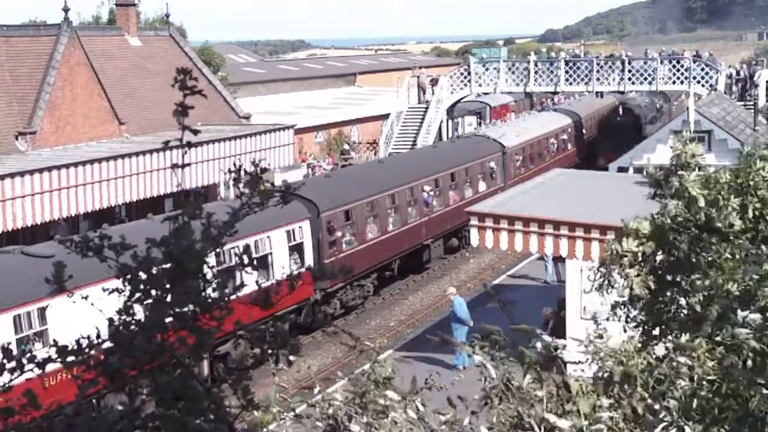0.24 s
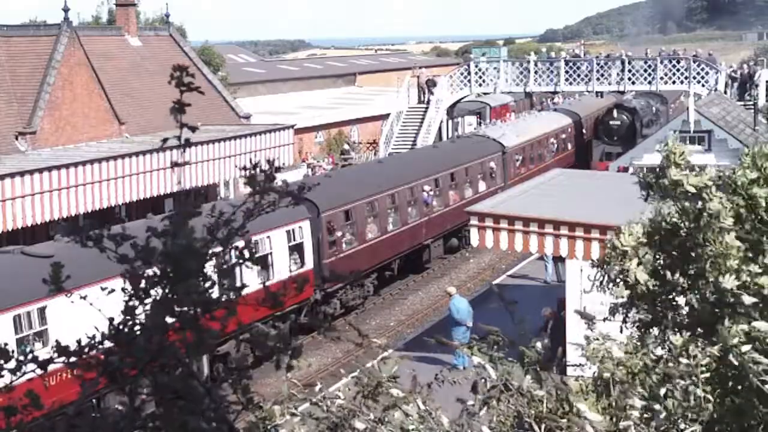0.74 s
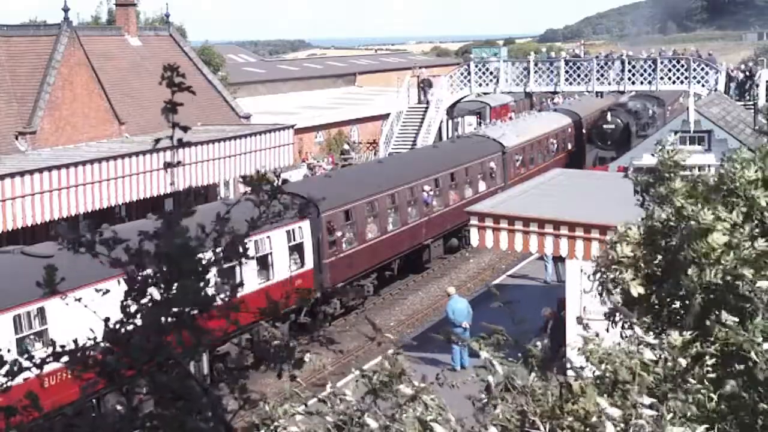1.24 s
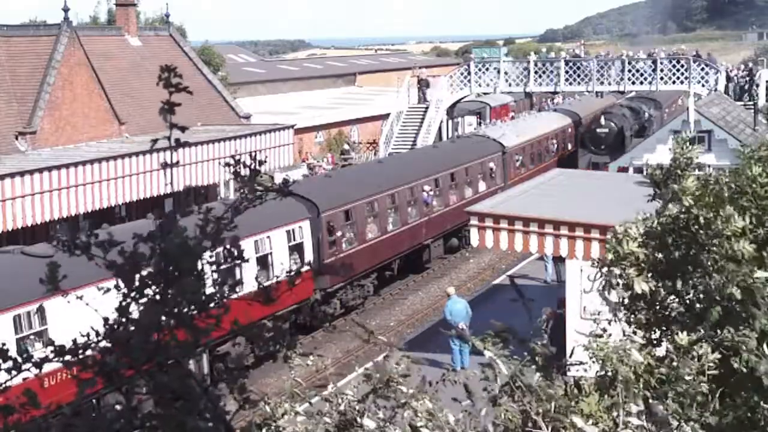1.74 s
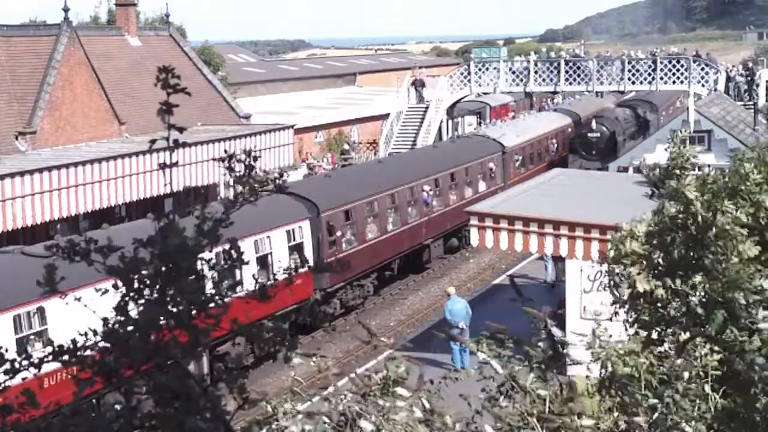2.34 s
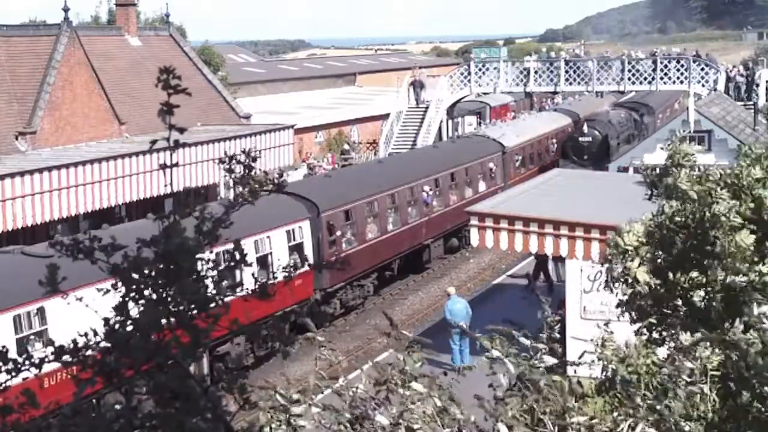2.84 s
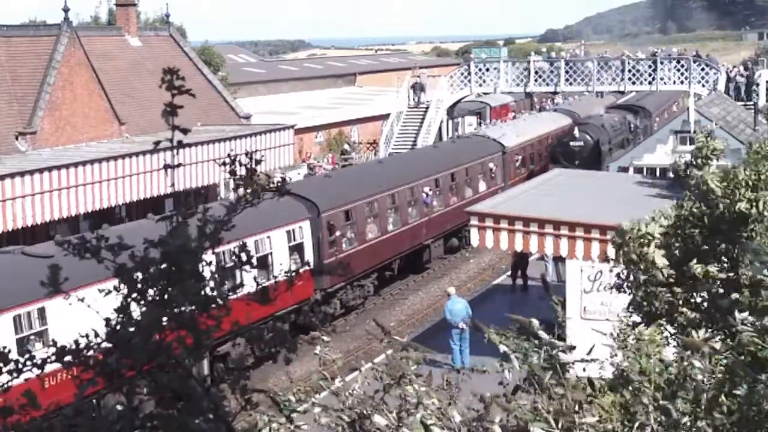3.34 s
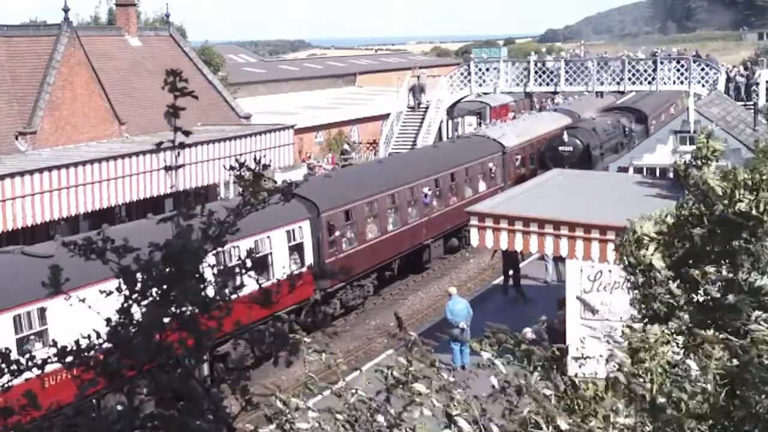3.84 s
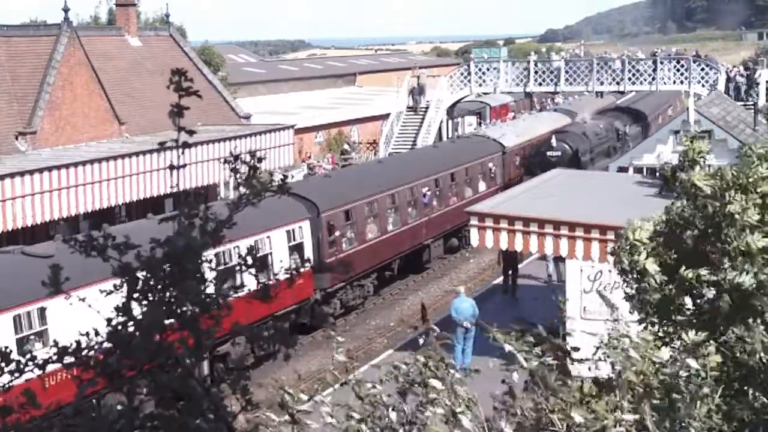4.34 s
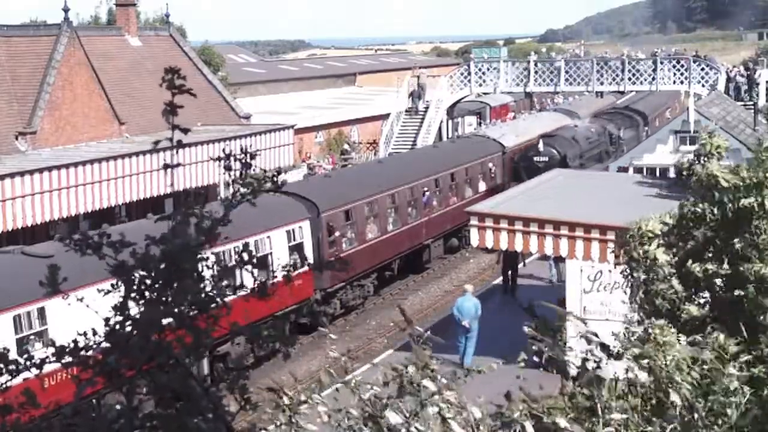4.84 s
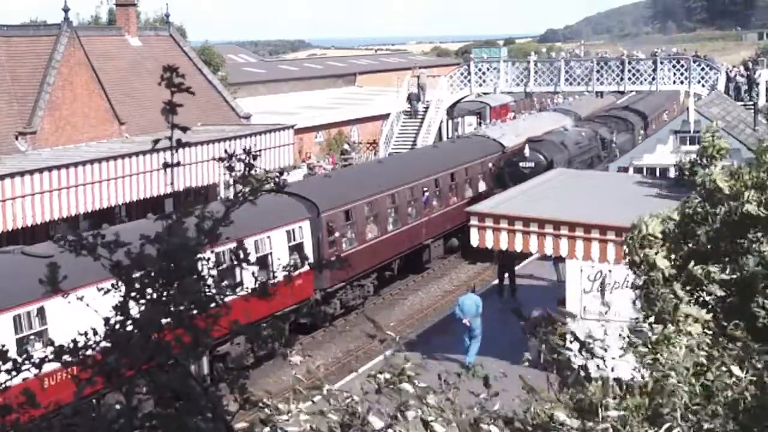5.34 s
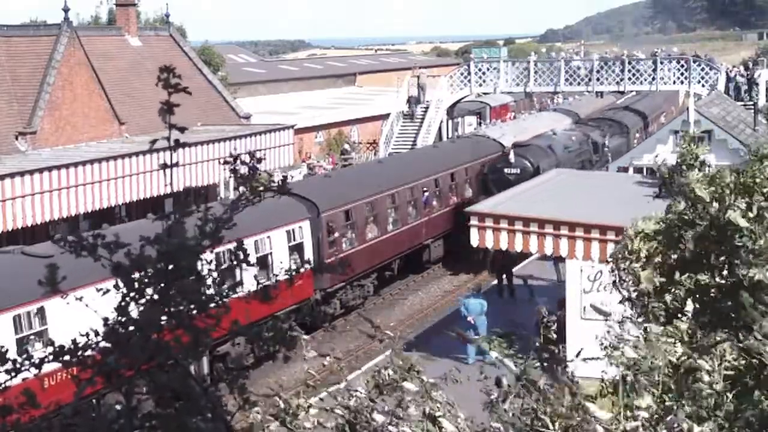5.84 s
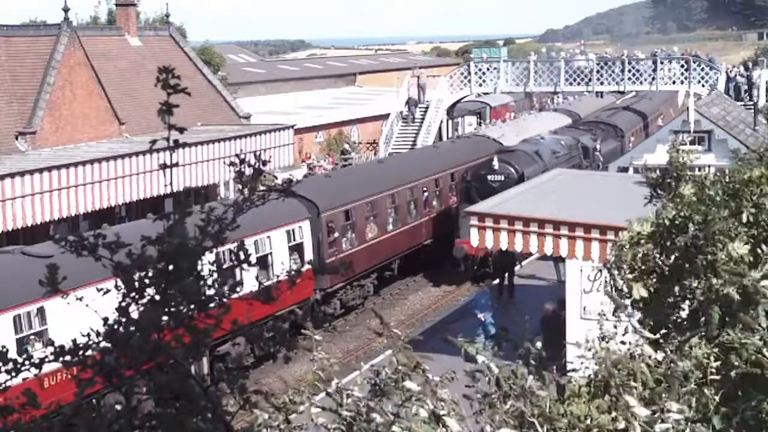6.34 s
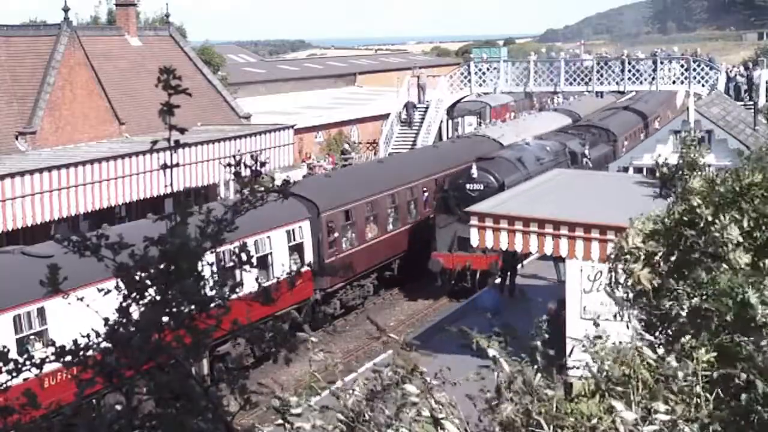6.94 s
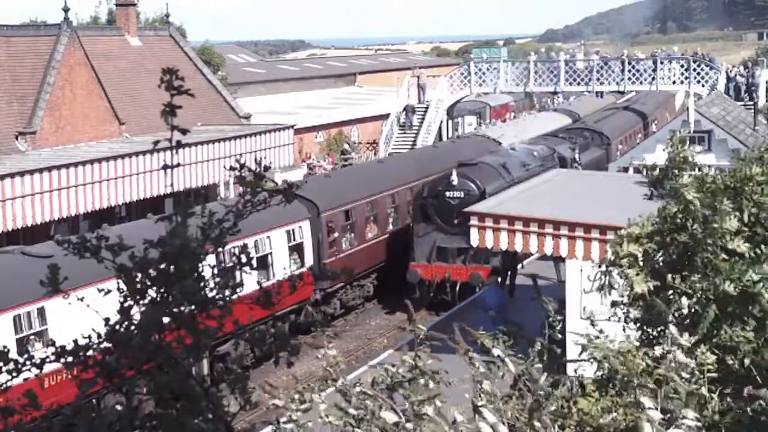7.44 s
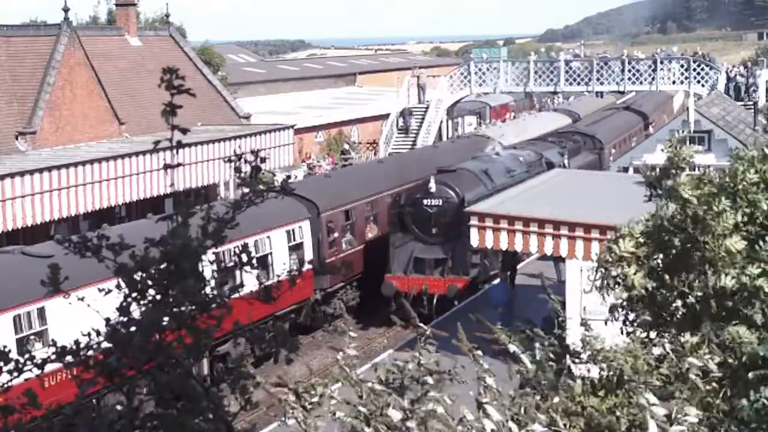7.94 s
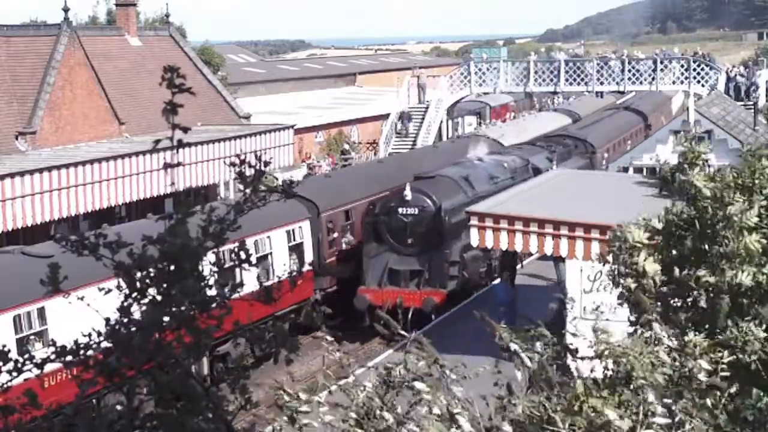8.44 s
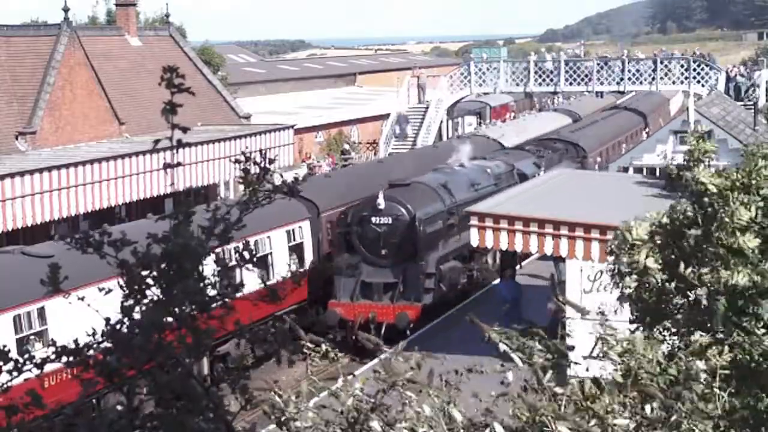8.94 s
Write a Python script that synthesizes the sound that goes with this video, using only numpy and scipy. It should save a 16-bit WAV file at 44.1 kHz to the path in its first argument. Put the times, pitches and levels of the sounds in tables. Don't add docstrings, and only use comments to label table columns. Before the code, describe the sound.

Fluttering steam hiss gradually strengthens above a low rolling rumble and falling hum, while a heavy wind gust thumps the microphone around three seconds.

```python
import sys
import numpy as np
from scipy import signal
from scipy.fft import rfft, irfft
from scipy.io import wavfile
from scipy.ndimage import uniform_filter1d, map_coordinates

SR = 44100
rng = np.random.default_rng(int(sys.argv[2]) if len(sys.argv) > 2 else 0)


def gain_from_decibels(decibels):
    exponent = np.asarray(decibels, float) / 20
    return 10 ** exponent


def to_wav(s):
    ch = np.atleast_2d(s).T
    pcm = np.round(np.clip(ch, -1, 1) * 32767)
    wavfile.write(sys.argv[1], SR, pcm.astype(np.int16))


N = 405279


def evened(x):
    return x / np.sqrt(np.mean(x ** 2) + 1e-20)


def read_spectrum(points, hz):
    f, value = np.transpose(points)
    return np.interp(np.log(hz + 1), np.log(f + 1), value)


def read_curves(rows, t):
    s, *values = np.transpose(rows)
    return [np.interp(t, s, v) for v in values]


def stft_axes(size):
    hop = size // 4
    frames = N // hop + 5
    return np.arange(frames) * hop / SR, np.fft.rfftfreq(size, 1 / SR)[:, None]


def wander(t, lo_hz, hi_hz, count=30):
    hz = np.geomspace(lo_hz, hi_hz, count)[:, None]
    sines = np.sin(2 * np.pi * (hz * t + rng.random((count, 1))))
    return evened((sines / np.sqrt(hz)).sum(0))


def resonance(x, centre, width):
    return 1 / (1 + (2 * (x - centre) / width) ** 2)


def levelled(shape_db, band):
    power = (gain_from_decibels(shape_db) ** 2 * band).sum(-2, keepdims=True)
    return shape_db - 10 * np.log10(power)


# (frequency [Hz], lead [rad])
PORT_LEAD = [(0, -0.72), (1380, 0.38), (1980, 0.78), (2670, -0.25), (5510, 0.38), (7240, -0.4),
             (8350, -1.26), (10100, 0.29), (11000, -0.019), (14800, 0.0)]


def noise_pair(db, hz, same, patchy_db):
    bins, frames = db.shape[1:]
    a, b, c, d, patches = rng.standard_normal((frames, bins, 5)).T
    patches = uniform_filter1d(patches, size=9, axis=0)
    patches = evened(uniform_filter1d(patches, size=12, axis=1))
    same = np.clip(same, 0, 1)
    left = a + 1j * b
    right = same * left + np.sqrt(1 - same ** 2) * (c + 1j * d)
    right = right * np.exp(-1j * read_spectrum(PORT_LEAD, hz))
    z = np.array([left, right]) * gain_from_decibels(db + patchy_db * patches)
    size = 2 * (bins - 1)
    return signal.istft(z, nperseg=size, noverlap=size * 3 // 4)[1][:, :N]


# (peak [s], jet rise [dB], lower hiss rise [dB], half length [s])
STEAM_SURGES = [(0.52, 7, 4, 0.14), (0.905, 1.5, -0.5, 0.17), (1.079, 6.5, 5, 0.18), (1.197, -1, 6, 0.14),
                (1.384, 6, 10.5, 0.11), (1.503, 8, 9.5, 0.082), (2.882, 6, 2.5, 0.089),
                (3.122, 2.5, 1.5, 0.095), (3.259, 0, 6, 0.085), (3.693, 6.5, 1.2, 0.059),
                (3.957, 3.5, 0.8, 0.083), (4.208, 1.5, 4.5, 0.051), (4.313, 1, 1.5, 0.049),
                (4.515, 3, 1.5, 0.117), (4.593, 3, -0.5, 0.042), (5.07, 7.5, 0, 0.075),
                (5.247, 1.8, -1, 0.098), (5.424, 7.5, 4, 0.088), (5.582, 3.3, 1.9, 0.12),
                (5.846, 2.5, 3, 0.076), (6.403, 4.5, 0.3, 0.044), (7.296, 2.5, 3, 0.22),
                (7.732, 4.5, 2, 0.15), (7.752, 5.5, 1, 0.03), (7.883, 3.5, -0.3, 0.056),
                (8.089, 7, 1.5, 0.19), (8.333, 3, 2, 0.071), (8.62, 4.5, -0.5, 0.125), (8.744, 6, 3, 0.07),
                (8.911, 6.5, 0.2, 0.137)]


def surges(t):
    s, jet_db, lower_db, half_s = np.transpose(STEAM_SURGES)[:, :, None]
    swell = np.maximum(1 - abs(t - s) / half_s, 0)
    return (jet_db * swell).sum(0), (lower_db * swell).sum(0)


# (frequency [Hz], density [dB/Hz])
JET_SPECTRUM = [(880, -19), (1500, -22.5), (1640, -14), (1820, -21.5), (2020, -8), (2290, -9.5), (3980, -6),
                (4560, -7.5), (6150, -6.5), (7830, -3), (8540, -4.5), (11700, -20), (15100, -32)]
# (frequency [Hz], width [Hz], left [dB], right [dB])
PORT_CAVITIES = [
    (2080, 130, 0, 4.5),
    (2290, 450, -6, -5.5),
    (4110, 165, 4.5, 3.5),
    (7870, 150, 2.5, -1),
    (7790, 1160, 8.5, -3.5),
]
# (frequency [Hz], difference [dB])
PORT_LEAN = [(60, 3.5), (99, -5.5), (160, 1.5), (270, -0.5), (440, -1.0), (730, -0.5), (1200, 0), (1980, 4),
             (3270, 0.5), (5390, 4.5), (8890, -3), (14600, 0.5)]
# (frequency [Hz], correlation [0-1])
PORT_LIKENESS = [(60, 0.95), (99, 0.95), (160, 1), (270, 0.98), (440, 0.98), (730, 0.94), (1200, 0.8),
                 (1980, 0.95), (3270, 1), (5390, 0.58), (8890, 0.71), (14600, 0.26)]
# (time [s], jet level [dB], lower hiss level [dB])
HISS_LEVEL = [(0.0, -40, -36), (0.16, -41.5, -35.5), (0.28, -34.5, -38), (0.77, -37.5, -40.5),
              (1.22, -36, -41.5), (1.6, -31, -38), (1.97, -35.5, -36.5), (2.66, -35.5, -40.5),
              (3.03, -35, -41.5), (3.31, -28.8, -35.5), (3.66, -31.5, -37.5), (3.75, -27.1, -35),
              (4.19, -29, -35), (5.16, -31, -33.5), (6.01, -26.5, -34.0), (7.46, -30.0, -36.2),
              (8.43, -30, -35), (9.19, -24.5, -30)]
SWAY_DB = 1.3


def steam():
    t, hz = stft_axes(size=1024)
    jet_db, lower_db = np.add(read_curves(HISS_LEVEL, t), surges(t))
    pan_db = SWAY_DB * wander(t, 1.9, 12)
    jet_share = 1 / (1 + (5300 / (hz + 1)) ** 6)
    shape_db = levelled(read_spectrum(JET_SPECTRUM, hz), (hz > 5500) & (hz < 11000))
    flicker_db = 0.62 * wander(t, 6, 40)
    level_db = jet_share * jet_db + (1 - jet_share) * (lower_db + 5.0) + flicker_db
    surge_db = jet_db - uniform_filter1d(jet_db, size=75)
    octaves_up = np.log2(np.maximum(hz / 9500, 1))
    treble_db = (2.4 * (t - 7) - 0.48 * surge_db) * octaves_up
    lean_db = read_spectrum(PORT_LEAN, hz) + jet_share * (pan_db - pan_db.mean())
    db = shape_db + level_db + treble_db + np.array([lean_db, -lean_db]) / 2
    for f, width_hz, *ports_db in PORT_CAVITIES:
        db = db + np.reshape(ports_db, (2, 1, 1)) * resonance(hz, f, width_hz)
    return gain_from_decibels(1.0) * noise_pair(db, hz, read_spectrum(PORT_LIKENESS, hz), patchy_db=1.5)


# (time [s], level [dB])
ROLLING_LEVEL = [(0.0, -47.5), (0.94, -46.5), (1.53, -44.5), (1.87, -45.5), (2.43, -43.5), (2.56, -45),
                 (2.76, -41), (3.15, -43), (3.61, -42.5), (6.4, -44), (6.63, -43.5), (7.68, -42.5),
                 (8.37, -42.5), (9.19, -39.5)]
# (frequency [Hz], density [dB/Hz])
ROLLING_SPECTRUM = [(12, -35), (25, 0), (50, -4), (100, -14), (200, -12), (330, -18.5), (450, -18),
                    (720, -22.5), (1000, -20), (1800, -24.5), (2600, -24), (4000, -45.5)]
# (frequency [Hz], width [Hz], rise [dB])
RAIL_RESONANCES = [
    (221, 14, 9),
    (460, 60, 4),
    (1000, 120, 2),
]


def rumble():
    t, hz = stft_axes(size=2048)
    level_db, = read_curves(ROLLING_LEVEL, t)
    near = np.clip((t - 3.5) / 1.52, 0, 1)
    shape_db = levelled(read_spectrum(ROLLING_SPECTRUM, hz), (hz > 700) & (hz < 1700))
    ring_db = sum(db * resonance(hz, f, width_hz) for f, width_hz, db in RAIL_RESONANCES) * near
    far_db = -4.1 * (1 - near) * resonance(hz, 350, 270)
    db = shape_db + level_db + ring_db + far_db + 0.27 * wander(t, 0.5, 8)
    db = db + np.array([1, -1])[:, None, None] * read_spectrum(PORT_LEAN, hz) / 2
    return gain_from_decibels(-0.5) * noise_pair(db, hz, read_spectrum(PORT_LIKENESS, hz), patchy_db=1.5)


# (time [s], pitch [Hz], level [dB])
DRONE_CURVE = [(0, 58.25, -41.5), (1, 56, -41.5), (2.4, 57.6, -48), (3.2, 57.33, -43), (3.42, 57.47, -39),
               (3.65, 56.5, -32), (4.19, 54.6, -33.5), (4.43, 55.6, -41.5), (4.61, 54.14, -30),
               (4.75, 53.9, -55), (4.94, 53.2, -33.5), (5.14, 52, -40.5), (6.09, 50.6, -34),
               (7.01, 46.84, -34), (7.5, 44.1, -34.5), (8.12, 40.45, -34), (8.75, 36.1, -34),
               (9.19, 31.85, -38.5)]


def drone():
    t = np.arange(N) / SR
    hz, level_db = read_curves(DRONE_CURVE, t)
    pitch_waver = .015 * wander(t[::64], 0.89, 9.0).repeat(64)[:N]
    waver_db = 0.96 * wander(t[::64], 1.4, 11.0).repeat(64)[:N]
    turns = np.cumsum(hz * (1 + pitch_waver)) / SR
    tone = np.sqrt(2) * gain_from_decibels(level_db + waver_db) * np.sin(2 * np.pi * turns)
    return tone * gain_from_decibels(np.array([[-.3], [.3]]))


# (time [s], pitch [Hz], level [dB])
RAIL_SONG = [
    (0, 485, -53),
    (.2, 484, -53),
    (.27, 482, -59),
]


def rail_tone():
    t = np.arange(N) / SR
    hz, level_db = read_curves(RAIL_SONG, t)
    fade_db = -150 * np.maximum(t - RAIL_SONG[-1][0], 0)
    return np.sqrt(2) * gain_from_decibels(level_db + fade_db) * np.sin(2 * np.pi * np.cumsum(hz) / SR)


def gusts(t, eddies, breeze_db):
    s, peak_db, die_s = np.transpose(eddies)[:, :, None]
    rise_share = 1.05
    away = np.maximum(t - s, (s - t) / rise_share) / die_s
    return np.maximum((peak_db - 20 * away ** 2).max(0), breeze_db)


# (frequency [Hz], density [dB/Hz])
EDDY_SPECTRUM = [(10, -17), (60, 3), (150, 3), (260, -0.5), (420, -3.5), (650, -10.5), (950, -18),
                 (1400, -25.5), (2100, -45), (4000, -43), (22050, -90)]
# (time [s], left level [dB], right level [dB])
BREEZE_LEVEL = [(0.0, -49, -54.0), (0.7, -54.0, -45), (1.5, -48, -49), (2.05, -54.0, -35.5),
                (2.3, -50, -54.5), (2.42, -20, -29.0), (2.54, -19.0, -25.0), (2.74, -19.5, -28.0),
                (2.85, -22.5, -20.0), (3.0, -34.5, -25.0), (3.2, -34, -25.0), (3.46, -52.0, -35.0),
                (3.65, -37.5, -30.0), (3.8, -49, -41.5), (5.4, -52.0, -50), (7.3, -57, -60),
                (8.4, -50, -50.0), (9.19, -47.5, -48.0)]
# (peak [s], peak level [dB], dying time [s])
GUST_EDDIES_LEFT = [(2.362, -21, 0.027), (2.397, -18.5, 0.067), (2.559, -13.5, 0.021),
                    (2.632, -12.0, 0.078), (2.712, -13.0, 0.059), (2.742, -10.5, 0.034),
                    (2.772, -11.0, 0.053), (2.867, -20.5, 0.022), (2.915, -22.0, 0.056), (3.06, -29, 0.072),
                    (3.124, -23.5, 0.0365), (3.332, -26.5, 0.148), (3.424, -34, 0.036),
                    (3.543, -22.5, 0.033), (3.656, -27.5, 0.044), (3.703, -25.5, 0.025)]
# (peak [s], peak level [dB], dying time [s])
GUST_EDDIES_RIGHT = [(2.34, -18.0, 0.019), (2.392, -25, 0.018), (2.464, -19.5, 0.017),
                     (2.552, -18.5, 0.051), (2.625, -17.0, 0.048), (2.714, -10, 0.045), (2.752, -13, 0.04),
                     (2.817, -9.0, 0.05), (2.918, -13.5, 0.054), (2.976, -14, 0.019), (3.013, -13.5, 0.023),
                     (3.091, -14.5, 0.095), (3.176, -14.5, 0.018), (3.243, -14.0, 0.018),
                     (3.284, -15.5, 0.028), (3.352, -17.5, 0.065), (3.422, -15.5, 0.018),
                     (3.518, -19.5, 0.026), (3.631, -28, 0.041)]
# (peak [s], peak level [dB], dying time [s])
STRAY_EDDIES_LEFT = [(0.139, -33, 0.026), (0.791, -25, 0.048), (0.94, -24.5, 0.094), (1.025, -28, 0.075),
                     (1.232, -23, 0.03), (1.262, -26, 0.045), (1.292, -20, 0.054), (1.341, -22.0, 0.024),
                     (1.403, -30, 0.053), (1.737, -32.5, 0.107), (1.863, -26.5, 0.031),
                     (3.945, -25.5, 0.031), (4.038, -30, 0.048), (4.069, -25.5, 0.02), (4.122, -35, 0.02),
                     (4.703, -31.5, 0.042), (5.047, -25.5, 0.026), (5.266, -36, 0.034),
                     (5.379, -31.5, 0.019), (7.83, -34, 0.021), (8.513, -37, 0.027), (8.7, -35, 0.058),
                     (8.841, -28.5, 0.019), (8.917, -29, 0.042)]
# (peak [s], peak level [dB], dying time [s])
STRAY_EDDIES_RIGHT = [(0.175, -32, 0.029), (0.292, -34, 0.052), (0.63, -29, 0.013), (0.744, -33, 0.077),
                      (0.947, -27, 0.041), (1.176, -28, 0.018), (1.217, -30, 0.017), (1.26, -26, 0.0497),
                      (1.318, -20.0, 0.054), (1.391, -26, 0.013), (1.685, -28, 0.053), (1.855, -24.0, 0.03),
                      (1.959, -29.5, 0.036), (2.237, -27.0, 0.064), (3.952, -26.5, 0.032),
                      (4.057, -30.0, 0.058), (4.322, -28, 0.018), (4.409, -18.0, 0.028),
                      (4.59, -26.5, 0.024), (4.946, -33, 0.02), (5.211, -26.0, 0.049),
                      (5.347, -27.5, 0.048), (8.513, -37, 0.02), (8.718, -32, 0.079), (8.834, -27.0, 0.035),
                      (8.932, -23.5, 0.047)]
SLACK_S, SLACK_SPAN_S, SLACK_DB = 3.35, .3, -3.5


def wind():
    t = np.arange(N) / SR
    lumps = evened(uniform_filter1d(rng.standard_normal((2, N)), size=60))
    lumpy = gain_from_decibels(4.75 * lumps) * rng.standard_normal((2, N))
    street = irfft(rfft(lumpy) * gain_from_decibels(read_spectrum(EDDY_SPECTRUM, np.fft.rfftfreq(N, 1 / SR))), N)
    street = evened(street / uniform_filter1d(street ** 2, size=700) ** 0.25)
    port_eddies = (GUST_EDDIES_LEFT + STRAY_EDDIES_LEFT, GUST_EDDIES_RIGHT + STRAY_EDDIES_RIGHT)
    slow_t = t[::32]
    slack_db = SLACK_DB * resonance(t, SLACK_S, SLACK_SPAN_S)
    ports = []
    for eddies, breeze_db, air in zip(port_eddies, read_curves(BREEZE_LEVEL, slow_t), street):
        gust_db = np.interp(t, slow_t, gusts(slow_t, eddies, breeze_db))
        speed_db = .72 * (uniform_filter1d(gust_db, size=1400) + 15) + slack_db
        speed = np.clip(gain_from_decibels(speed_db), .36, 1.7)
        passing = map_coordinates(air, [np.cumsum(speed)], order=3, mode="wrap")
        ports.append(gain_from_decibels(gust_db + 3.5) * passing)
    return signal.lfilter(*signal.butter(1, 35, "high", fs=SR), ports)


def scene():
    return steam() + rumble() + drone() + rail_tone() + wind()


def roll_off(x):
    return signal.sosfilt(signal.butter(12, 15250, fs=SR, output="sos"), x)


def record(dry):
    ceiling = .8
    mix = ceiling * np.tanh(dry / ceiling)
    return roll_off(mix)


dry = scene()
out = record(dry)
to_wav(out)
```